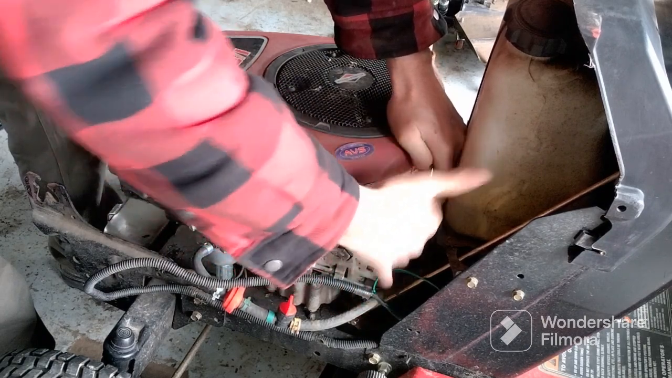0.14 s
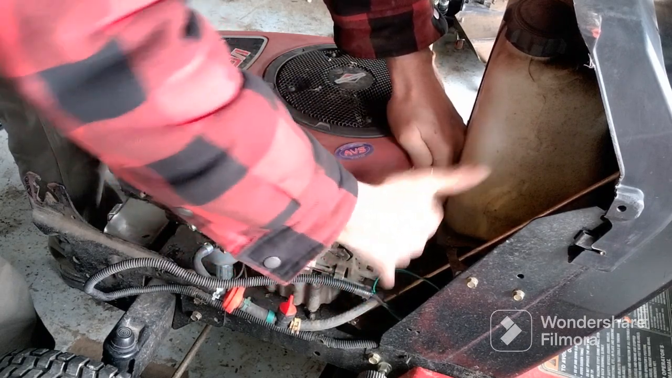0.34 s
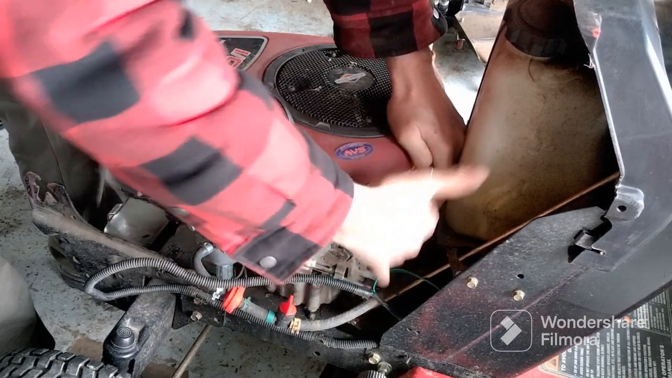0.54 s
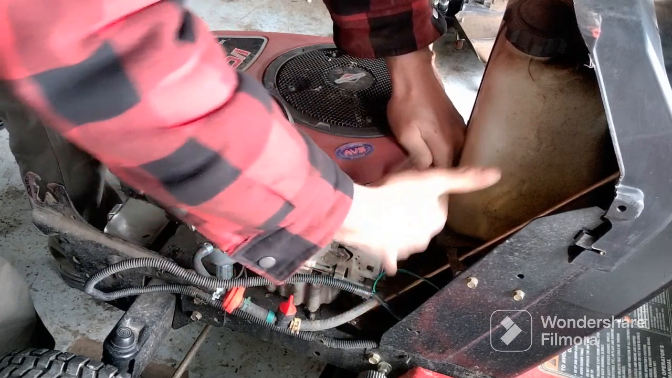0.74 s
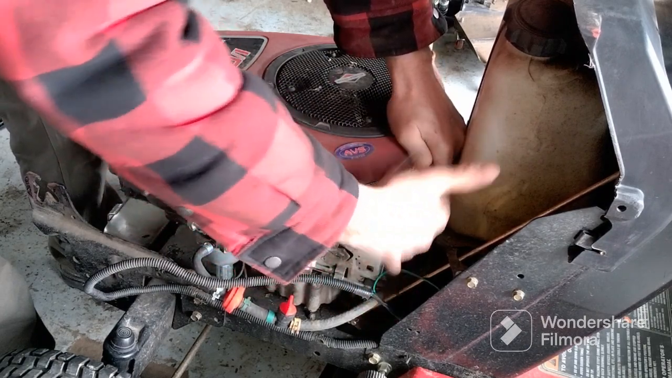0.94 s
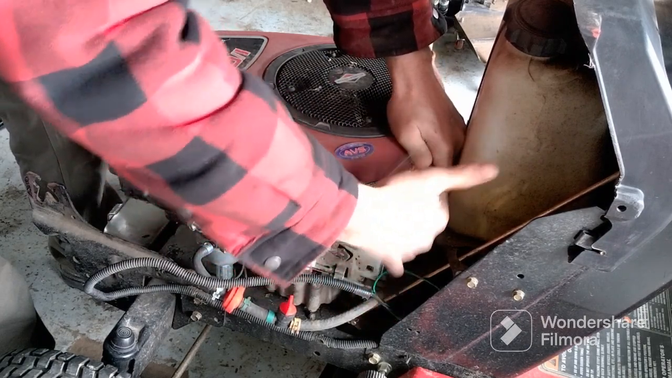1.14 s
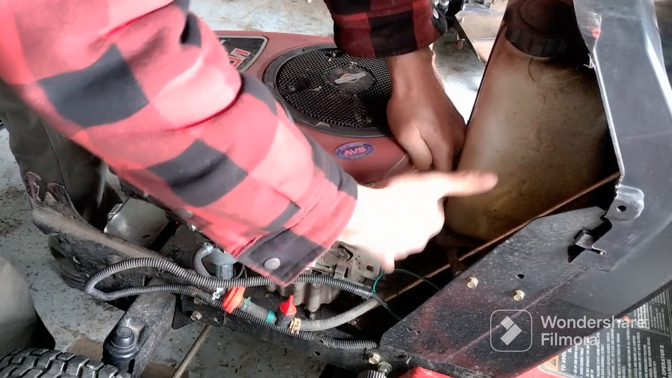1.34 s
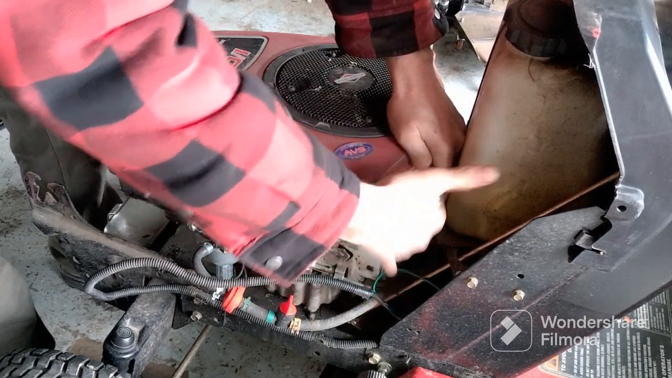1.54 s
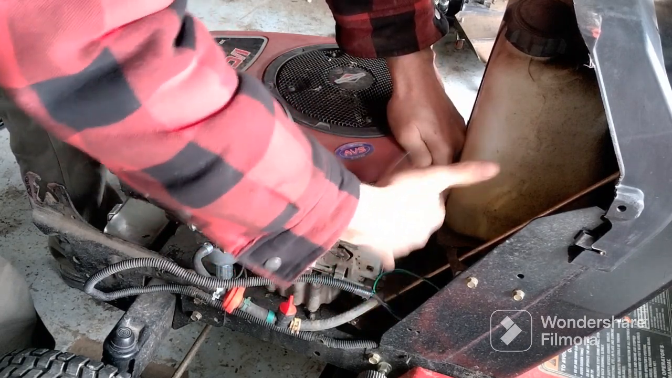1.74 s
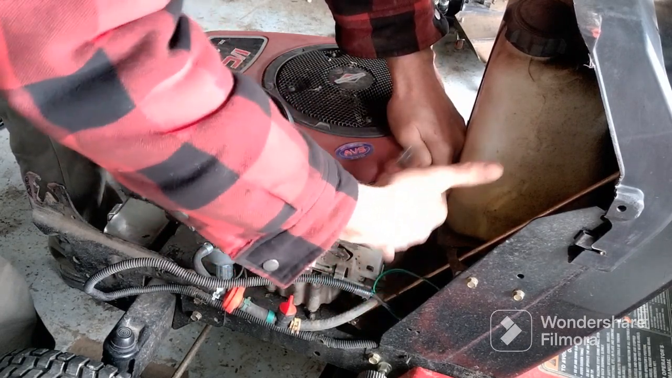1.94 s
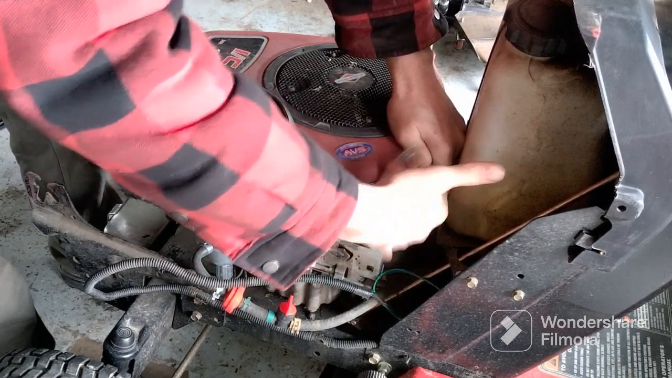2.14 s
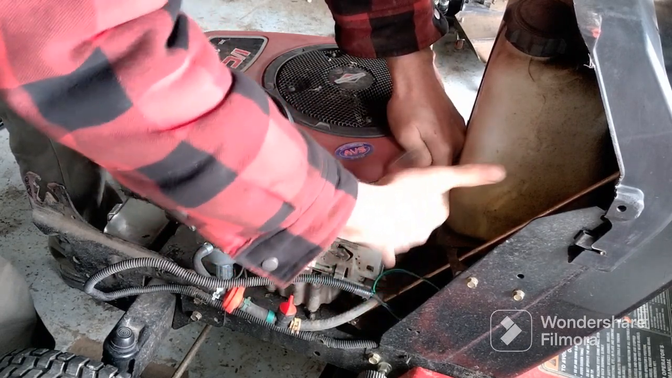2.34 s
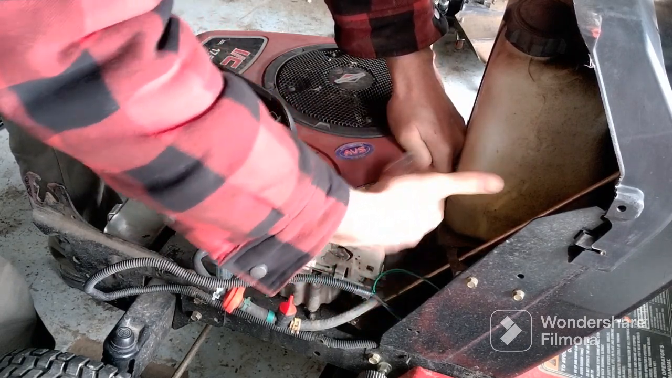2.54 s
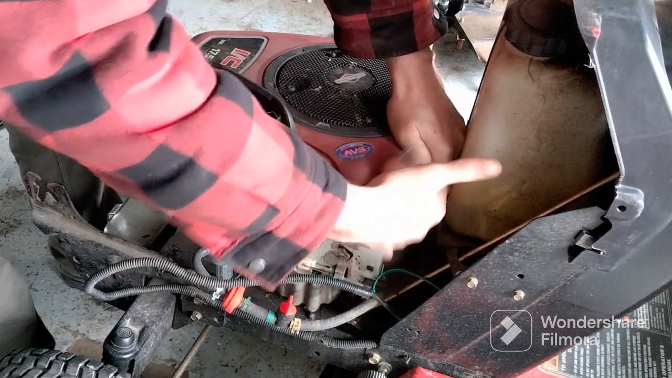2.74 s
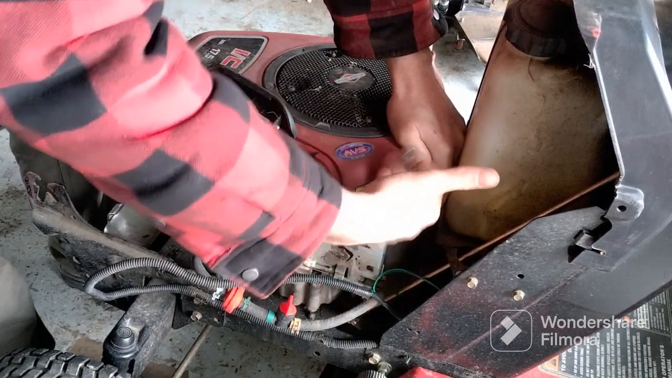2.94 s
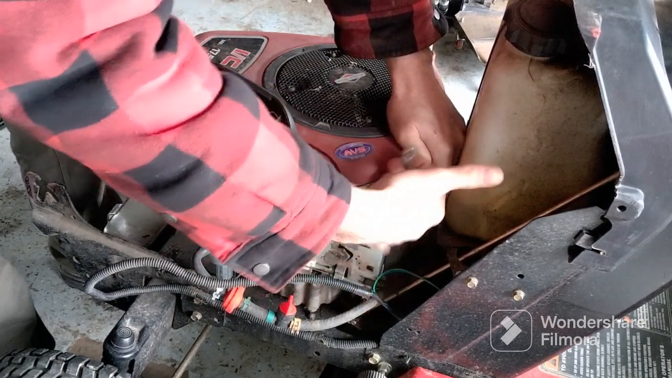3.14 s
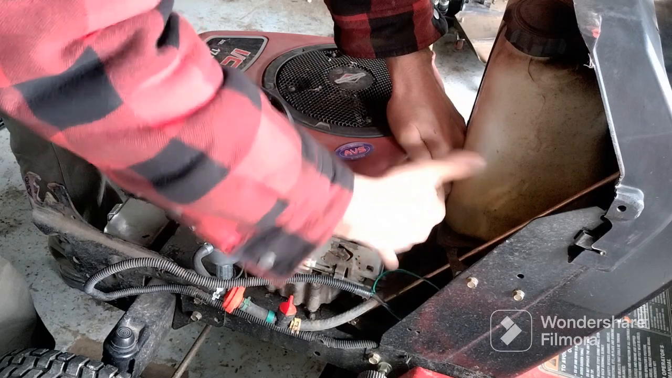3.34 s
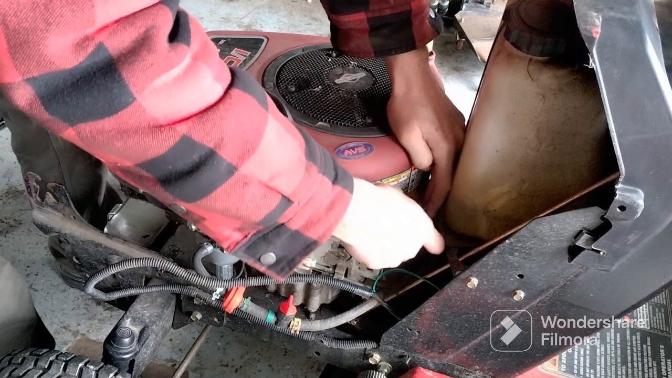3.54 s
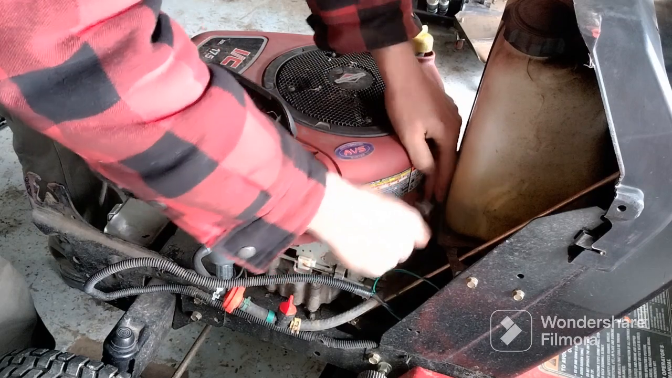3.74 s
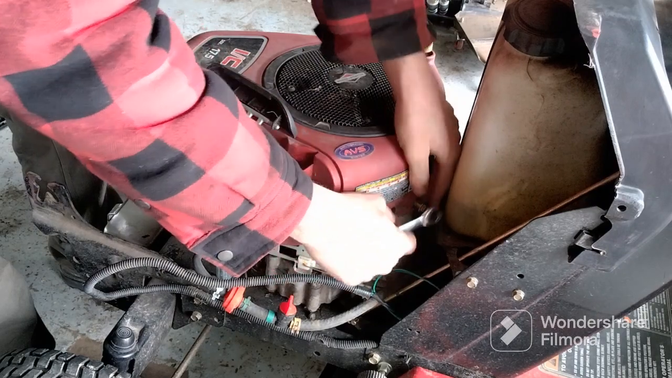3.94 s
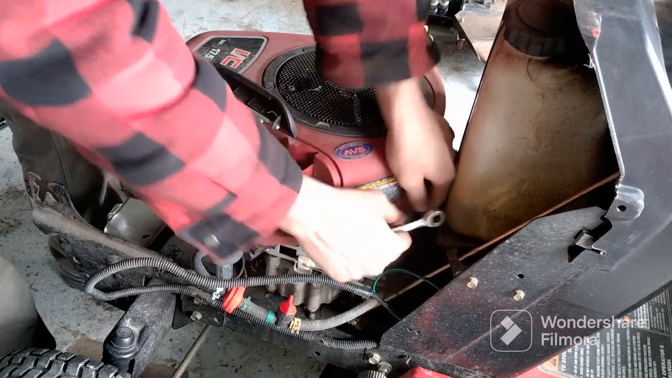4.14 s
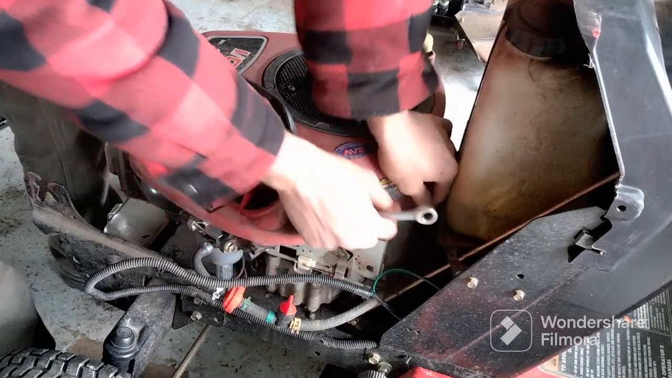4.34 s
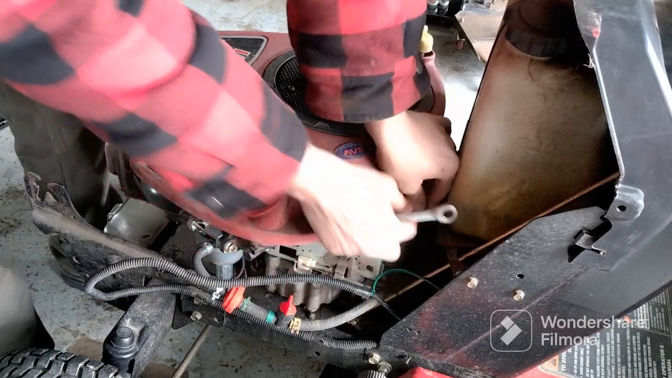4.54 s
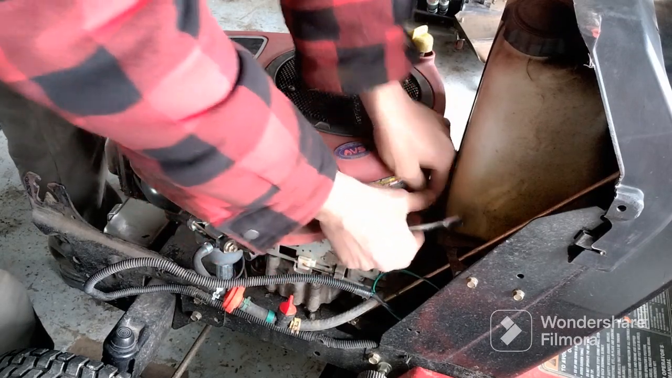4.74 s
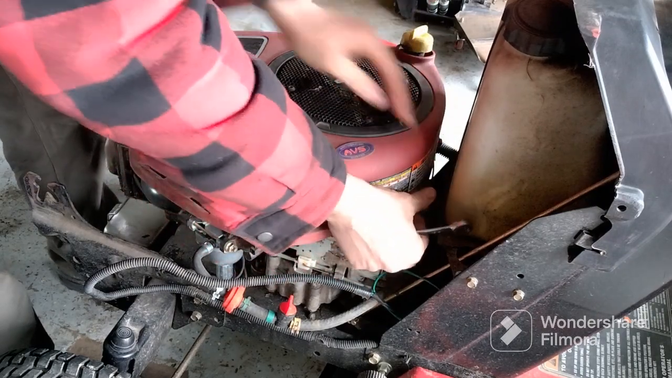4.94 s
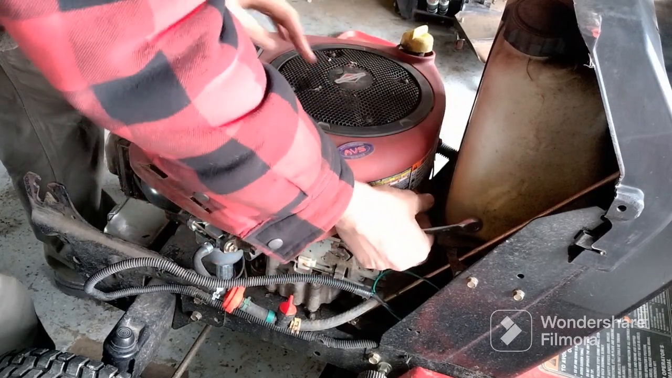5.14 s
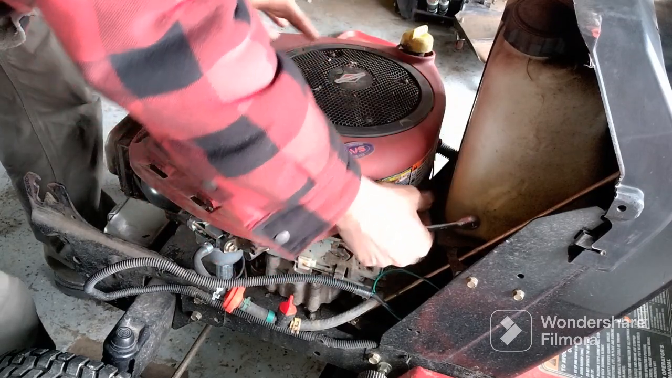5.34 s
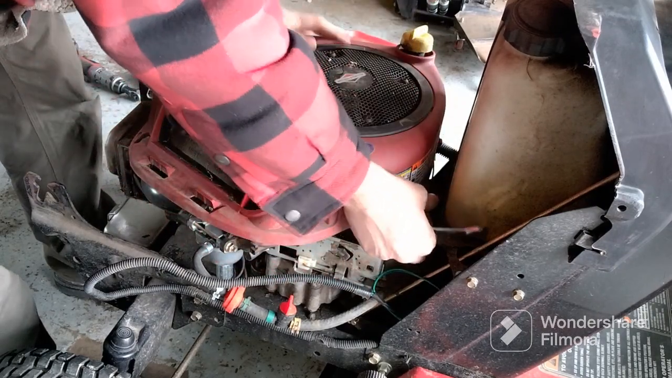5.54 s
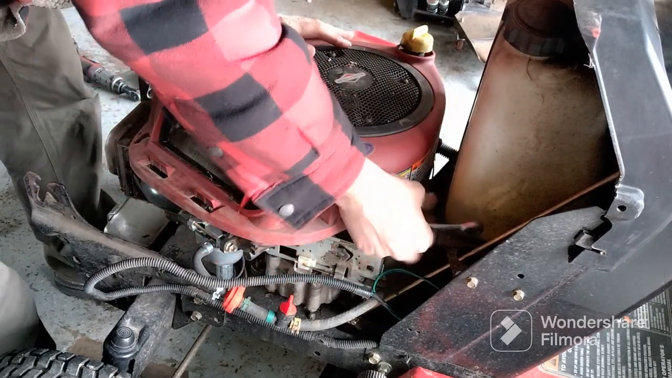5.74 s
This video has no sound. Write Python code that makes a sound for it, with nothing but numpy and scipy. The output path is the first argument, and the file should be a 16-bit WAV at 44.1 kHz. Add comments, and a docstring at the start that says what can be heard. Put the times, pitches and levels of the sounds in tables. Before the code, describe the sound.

A ratchet wrench clicks in quick, even bursts on an engine, then metal clanks once and a low hum swells and fades.

```python
"""Ratchet wrench on a mower engine

A ratchet wrench backs a bolt out, five quick swings a second. On each return swing its pawl (a small
catch) zips over the gear teeth. Tool and hands bump the engine cover, then metal knocks hard once.
A low hum swells and fades, sleeves brush about, and the workshop echoes briefly after each knock."""
import sys
import numpy as np
from scipy import signal
from scipy.fft import rfft, irfft
from scipy.io import wavfile

SR = 44100
rng = np.random.default_rng(int(sys.argv[2]) if len(sys.argv) > 2 else 0)


def log_audio(samples):
    """Write samples as a 16-bit WAV file to the path given in sys.argv[1]."""
    # one column per channel
    frames = np.atleast_2d(samples).T
    # limit to full scale, then quantise
    limited = np.clip(frames, -1, 1)
    pcm = np.round(limited * 32767).astype(np.int16)
    wavfile.write(sys.argv[1], SR, pcm)


N = 255339
TIME = np.arange(N) / SR
EVENT_N = 2 ** 15  # samples in one short sound
EVENT_TIME = TIME[:EVENT_N]

# return swings of the wrench: (start [s], length [s], level [dB], extra ring of its head [dB])
SWINGS = [(.008, 0.057, -38, 0), (0.2333, 0.061, -35, 7.5), (0.434, 0.048, -33.5, 8),
          (0.6435, 0.039, -32.5, 9), (0.845, 0.05, -36, 2.5), (1.057, 0.039, -33, 5),
          (1.259, .046, -35, -0.5), (1.46, 0.05, -35, 4), (1.659, 0.05, -33, 4.5), (1.8629, .042, -32, 4.5),
          (2.068, 0.042, -34, 7.5), (2.278, 0.044, -34.5, 9.5), (2.467, .04, -36, 6.5),
          (2.671, 0.041, -34.5, 5), (2.866, 0.043, -35.5, 9.5), (3.082, 0.043, -33.5, 8.5),
          (3.292, 0.04, -33.5, 4.5), (3.475, 0.047, -32.5, 5.5)]


def ratchet(slow_hz=215, fast_hz=320, slow_db=-3.5, snap_db=2, ring_db=-20, detune=0.0058):
    """The pawl drops into each tooth, faster and harder in mid swing, and rings the wrench head."""
    # tone of a click: (frequency [Hz], level [dB])
    pawl_tone = [(700, -33), (1900, -11), (2560, -8.5), (3900, -5.5), (4400, 1), (5200, -2.5), (6100, 1.5),
                 (8300, 2.5), (9700, -1), (10300, -1), (11400, -4.5), (12700, -3.5), (13550, -1.5),
                 (14300, -10)]
    # ringing notes of the wrench head: (frequency [Hz], level [dB], fade time [s])
    head_modes = [(2576, -8.5, 0.058), (2949, -17, 0.073), (4600, -11.5, 0.06), (6340, -12, 0.099),
                  (7820, 1.5, .05), (8580, -3, 0.087), (9440, 6.5, 0.036), (11320, -3.5, 0.066),
                  (13760, 0, 0.0124), (13600, -31, 0.015), (13330, 12.5, 0.033), (13640, 8.5, 0.035)]
    out = np.zeros((2, N))
    size = 4096  # samples in a click
    for start, length, db, extra_ring_db in SWINGS:
        swing = np.zeros((2, 2 * size))
        shared_noise = rng.standard_normal((2, size))
        # the grip changes from swing to swing, and with it the tone and the ring
        tone = [(hz, band_db + 2 * rng.standard_normal()) for hz, band_db in pawl_tone]
        modes = [(hz * (1 + detune * rng.standard_normal()), mode_db + 2 * rng.standard_normal(), t60)
                 for hz, mode_db, t60 in head_modes]
        ringing = amp(ring_db + extra_ring_db) * ring(modes, spread=0.72)[:, :size]
        # every tooth meets the pawl a little differently
        chances = rng.standard_normal((32, 2))
        tooth_noises = rng.standard_normal((32, 2, size))
        s = 0
        for (late, hard), tooth_noise in zip(chances, tooth_noises):
            if s > length:
                break
            speed = np.sin(np.pi / 2 * np.interp(s / length, [0, 0.42, 1], [0, 1, 0]))
            burst = (shared_noise + 0.58 * tooth_noise) * fade(t60=0.023)[:size]
            click = colour(burst, tone) + ringing
            force_db = 2 * hard if s else snap_db  # the first tooth breaks free with a firm snap
            add(swing, s, click * amp(slow_db * (6 - speed) + force_db))
            teeth_per_s = slow_hz + (fast_hz - slow_hz) * speed
            s += (1 + 0.08 * late) / teeth_per_s
        gain = amp(db) / rms(swing[:, :int(length * SR)])
        add(out, start, gain * swing)
        # a faint tick of varying strength sounds just before each swing
        add(out, start - 0.005, gain * amp(slow_db - 30) * rng.random() * click)
    return room(out, wet_db=-6)


def clank(crack_db=3, ring_db=-26):
    """Metal strikes the engine, chatters and lands again."""
    # hard blows: (time [s], level [dB], treble tilt [dB per octave], fade time [s])
    blows = [(3.955, -10, 1.5, 0.039), (3.9569, -17.5, 0.5, 0.034), (3.963, -14, -2, 0.031),
             (4.056, -24, -1.5, 0.032)]
    # tone of the crack: (frequency [Hz], level [dB])
    steel_tone = [(110, -21), (260, 5), (370, -5.5), (500, 1.5), (1600, -4.5), (1830, -11.5), (3000, -6.5),
                  (3600, -11), (4500, -3), (5300, -1.5), (6150, -14.5), (7400, -2.5), (8650, -8),
                  (10700, -24), (11800, -15.5), (14300, -22)]
    # ringing notes of the engine: (frequency [Hz], level [dB], fade time [s])
    engine_modes = [(168, -5.5, 1), (260.8, -1.5, 0.65), (474, -6, 0.36), (725, -2, 0.3), (770, -2.5, 0.3),
                    (973, -8, 0.3), (1156, 0.5, 0.37), (1290, -1.5, 0.3), (1350, 1, 0.14),
                    (1565, -5.5, 0.27), (1652, -2, 0.29), (2430, -6, 0.25), (2690, -2.5, 0.25),
                    (3120, -0.5, 0.056), (3800, -9, 0.22), (4136, 3, 0.095), (4378, -5.5, 0.18),
                    (4629, -4, 0.18), (4990, -3, 0.18), (5229, -1, 0.18), (6190, 2, 0.081),
                    (7230, -2.5, 0.087), (7700, -6, 0.08)]
    out = np.zeros((2, N))
    for s, db, tilt_db, t60 in blows:
        crack = colour(stereo_noise(EVENT_N, apart_hz=1200) * fade(t60), steel_tone, tilt_db)
        ringing = ring(engine_modes, spread=0.97)
        add(out, s, amp(db) * (amp(crack_db) * crack + amp(ring_db) * ringing))
    return room(pan(out), wet_db=-6)


def bumps(gain_db=1, ring_db=-15, spot_db=1.5, contact_s=0.001):
    """Tool and hands knock dully on the engine cover; each spot brings out different notes."""
    # knocks: (time [s], level [dB], treble tilt [dB per octave], fade time [s])
    knocks = [(.002, -32.5, 2.5, 0.039), (0.013, -36, -4.5, 0.056), (.232, -47, -8, 0.097),
              (.329, -34, 4, 0.071), (.433, -45.5, -4.5, .075), (.531, -49, 5.5, 0.037),
              (.689, -41.5, -4, 0.028), (0.74, -41.5, -1, 0.039), (1.882, -42, 4, .12),
              (1.905, -41, -2, 0.047), (1.943, -41, 4, 0.029), (2.065, -36.5, 1.5, 0.054),
              (2.359, -34.5, 3.5, 0.031), (2.474, -41.5, -7, 0.035), (2.548, -42, 0.5, 0.15),
              (3.128, -51, -8, 0.069), (3.81, -46.5, 0.5, .08), (3.877, -41.5, 7, 0.3),
              (4.0561, -23.5, 4.5, 0.057), (4.0612, -34.5, 4, 0.091), (5.087, -31, -1.5, 0.05),
              (5.223, -44.5, -1.5, 0.093), (5.551, -47, -7, 0.034), (5.765, -53.5, 1, .066)]
    # tone of the thud: (frequency [Hz], level [dB])
    cover_tone = [(100, -25), (250, -19.5), (380, 3.5), (520, -0.5), (700, 0.5), (930, 4.5), (1150, -3),
                  (1650, -8), (1900, -14), (3500, -20.5), (7000, -30.5), (14000, -54.5)]
    # ringing notes of the cover: (frequency [Hz], level [dB], fade time [s])
    cover_modes = [(370, -6, 0.029), (518, 5.5, 0.1), (557, 4.5, 0.069), (868, -5.5, 0.043),
                   (938, -4.5, 0.051), (1227.5, 7.5, 0.03), (1327, -2.5, 0.066), (1508, -1, 0.059),
                   (1630, -9, 0.068)]
    out = np.zeros((2, N))
    push = 1 - np.exp(-EVENT_TIME / contact_s)  # the cover gives a little before it sounds
    # a faint extra knock each time the wrench turns round
    nudges = [(start, -59.5 + 0.5 * rng.standard_normal(), -4.5, 0.13) for start, *_ in SWINGS]
    for s, db, tilt_db, t60 in nudges + knocks:
        modes = [(hz, mode_db + tilt_db * np.log2(hz / 800) + spot_db * rng.standard_normal(), decay)
                 for hz, mode_db, decay in cover_modes]
        thud = colour(stereo_noise(EVENT_N, apart_hz=1886) * fade(t60), cover_tone, tilt_db)
        knock = push * (thud + amp(ring_db) * ring(modes, spread=0.92))
        add(out, s, knock * amp(db + gain_db) / rms(knock[:, :int(0.009 * SR)]))
    return room(pan(out), wet_db=-7.5)


def rough_bursts(grain_hz=350):
    """Short rough bands of noise: scrapes on the cover, and the brief ring as the metal lands again."""
    # bursts of noise: (start [s], length [s], level [dB], centre frequency [Hz])
    bursts = [(.019, 0.077, -54, 644), (1.519, 0.057, -50.5, 640), (2.761, 0.081, -55.5, 670),
              (3.128, 0.053, -49.5, 316), (3.808, 0.02, -48, 1090), (3.875, 0.037, -32.5, 1030),
              (4.06, 0.016, -34.5, 1190), (5.08, 0.079, -36.5, 274), (5.239, 0.29, -72, 3100),
              (5.354, 0.085, -53.5, 848), (5.381, 0.07, -47.5, 265), (5.54, 0.042, -48, 600),
              (5.601, 0.17, -47, 80.6)]
    out = np.zeros((2, N))
    for s, length, db, hz in bursts:
        roughness = grains(EVENT_N, hold=int(SR / grain_hz), scatter_db=4)
        arch = np.sqrt(np.abs(np.sin(np.pi * np.minimum(EVENT_TIME / length, 1))))
        noise = band(stereo_noise(EVENT_N, apart_hz=1510) * roughness, hz, width_hz=0.58 * hz)
        add(out, s, amp(db) * arch * unit(noise))
    return room(pan(out), wet_db=-7)


def hum(growth_db_per_s=13, octave_db=-29, idle_db=-58, waver_db=-26):
    """A nearly pure, wavering low drone comes in growing swells and sinks slightly in pitch."""
    # swells: (start [s], hold [s], level at the end of the hold [dB], fall [s])
    swells = [(3.26, 0.14, -50, 0.024), (3.542, 0.087, -48.5, 0.12), (3.941, 1.123, -32, 0.18),
              (5.62, 0.061, -44.5, 0.033)]
    # path of the pitch: (time [s], pitch [Hz])
    pitch_path = [(3.3, 126.7), (4.15, 121.1), (4.8, 119.9), (5.25, 120.2), (5.62, 116.6), (5.75, 111)]
    phase = 2 * np.pi * np.cumsum(np.interp(TIME, *np.transpose(pitch_path))) / SR
    waver = unit(colour(rng.standard_normal(N), [(10, -8), (20, -23), (60, -95)]))
    gain = amp(idle_db) * waver
    for s, hold, db, fall in swells:
        growing = amp(db - growth_db_per_s * np.maximum(s + hold - TIME, 0))
        gain += swell(s, rise=0.034, fall=fall, hold=hold) * (growing + amp(db + waver_db) * waver)
    return np.sqrt(2) * gain * (np.sin(phase) + amp(octave_db) * np.sin(2 * phase))


def sleeves(gain_db=-1):
    """Cloth fibres catch and slip in a soft, grainy hiss with each stroke of the arm."""
    # arm strokes: (time of top speed [s], level [dB], rise [s], fall [s])
    strokes = [(4.14, -49, .025, 0.039), (4.28, -55.5, 0.083, 0.041), (4.345, -63.5, 0.0093, 0.016),
               (4.55, -62.5, 0.067, 0.035), (4.665, -65, 0.03, 0.027), (5.04, -55.5, 0.088, 0.081),
               (5.648, -65.5, 0.019, .015)]
    # tone of the cloth: (frequency [Hz], level [dB])
    cloth_tone = [(880, -12.5), (1500, -3.5), (1960, -12), (2300, -7.5), (2920, -11), (3180, -10),
                  (8520, -6.5), (14500, -21)]
    speed = sum(amp(db + gain_db) * swell(s, rise, fall) for s, db, rise, fall in strokes)
    catches = grains(N, hold=64, scatter_db=3)
    return speed * unit(colour(stereo_noise(N) * catches, cloth_tone))


def tink(at_s=5.44, level_db=-60):
    """A light touch makes the loose wrench ring faintly."""
    # ringing notes of the handle: (frequency [Hz], level [dB], fade time [s])
    handle_modes = [(4230, 0, 0.052), (4270, 5, 0.042), (4530, 2.5, 0.061)]
    out = np.zeros((2, N))
    add(out, at_s, amp(level_db) * ring(handle_modes))
    return room(out, wet_db=-7)


def socket(level_db=-70, after_s=0.11):
    """On the driving stroke between two zips, the bolt and socket scrape faintly."""
    turning = sum(amp(level_db + 4 * rng.standard_normal()) * swell(s + after_s, rise=0.027, fall=0.04)
                  for s, *_ in SWINGS[:-1])
    roughness = grains(N, hold=128, scatter_db=4)
    return turning * unit(band(stereo_noise(N) * roughness, hz=4800, width_hz=4500))


def air(rumble_db=-54.5, rustle_db=-61):
    """The workshop rumbles quietly; arms and cover rustle unevenly while the wrench swings."""
    # tones of the rumble and the rustle: (frequency [Hz], level [dB])
    rumble_tone = [(15, -9), (25, -18), (54, 1.5), (129, -0.5), (187, -8), (257, -6.5), (335, -18.5),
                   (781, -12), (2250, -32), (3010, -31.5), (6850, -42), (8470, -38), (10700, -56),
                   (14000, -46.5)]
    rustle_tone = [(60, -10), (200, -11.5), (500, -9), (1100, -8), (2000, -35), (5000, -18), (14000, -38)]
    effort = np.interp(TIME, [0, 2.9, 3.7], [0.93, 0.67, 0])
    rustle = colour(stereo_noise(N), rustle_tone)
    uneven = amp(3 * np.interp(TIME, np.linspace(0, TIME[-1], 80), rng.standard_normal(80)))
    rumble = unit(colour(stereo_noise(N, bass_width=0.33), rumble_tone))
    return amp(rumble_db) * rumble + amp(rustle_db) * effort * uneven * rustle


def room(x, wet_db, build_s=0.0093):
    """Add the workshop's short echo at wet_db; its treble dies first."""
    # how long the echo lasts: (frequency [Hz], fade time [s])
    echo_times = [(100, 0.69), (400, 0.31), (1500, 0.36), (4500, 0.26), (8000, 0.21), (11000, 0.18),
                  (14000, 0.15)]
    hz, s, spectrum = signal.stft(stereo_noise(EVENT_N, apart_hz=800), SR)
    t60 = np.interp(hz, *np.transpose(echo_times))
    spectrum *= np.exp(-np.log(1000) * s / t60[:, None])
    tail = signal.istft(spectrum, SR)[1][:, :EVENT_N]
    tail *= 1 - np.exp(-(EVENT_TIME / build_s) ** 2)
    tail /= np.sqrt(np.sum(tail ** 2) / 2)
    return x + amp(wet_db) * signal.fftconvolve(x, tail, axes=1)[:, :N]


def ring(modes, spread=0.85):
    """A struck object's own fading notes (modes), slightly out of step between left and right."""
    out = 0
    for hz, db, t60 in modes:
        phase = spread * rng.uniform(-0.76, 1, (2, 1)) * min(hz / 1000, 2)
        out = out + amp(db) * fade(t60) * np.sin(2 * np.pi * hz * EVENT_TIME + phase)
    return out


def stereo_noise(size, apart_hz=900, bass_width=0.16):
    """Noise from all around: left and right are alike in the bass, unrelated above apart_hz."""
    mid, side = rng.standard_normal((2, size))
    width = np.clip(np.fft.rfftfreq(size, 1 / SR) / apart_hz, bass_width, 1)
    side = irfft(rfft(side) * width, size)
    return unit(mid + side * np.array([[1], [-1]]))


def colour(x, tone, tilt_db=0):
    """Filter a sound through (frequency [Hz], level [dB]) points, brighter by tilt_db per octave."""
    size = x.shape[-1]
    octave = np.log2(np.maximum(np.fft.rfftfreq(size, 1 / SR), 10))
    hz, db = np.transpose(tone)
    tilt = tilt_db * np.clip(octave, np.log2(200), np.log2(8000))
    gain = unit(amp(np.interp(octave, np.log2(hz), db) + tilt))
    # fold the filter forward in time, so that nothing sounds before a hit
    cepstrum = irfft(np.log(gain), size)
    cepstrum[1:size // 2] *= 2
    cepstrum[size // 2 + 1:] = 0
    return irfft(rfft(x) * np.exp(rfft(cepstrum)), size)


def band(x, hz, width_hz):
    """Keep only the frequencies around hz."""
    low = np.sqrt(hz ** 2 + (width_hz / 2) ** 2) - width_hz / 2
    return signal.sosfilt(signal.butter(3, [low, low + width_hz], "bandpass", fs=SR, output="sos"), x)


def grains(size, hold, scatter_db):
    """Roughness: a gain that jumps at random every `hold` samples."""
    return amp(scatter_db * np.repeat(rng.standard_normal(size // hold + 1), hold)[:size])


def swell(start, rise, fall, hold=0):
    """A gain that rises smoothly to 1 at the start, holds, then falls smoothly."""
    early = np.maximum(start - TIME, 0)
    late = np.maximum(TIME - start - hold, 0)
    return np.exp(-(early / rise) ** 2 - (late / fall) ** 2)


def fade(t60):
    """A gain that drops by 60 dB in t60 seconds, the fade time."""
    return np.exp(-np.log(1000) * EVENT_TIME / t60)


def pan(x, left_db=-1.5):
    """Make the left side differ from the right by left_db."""
    return x * amp([[left_db / 2], [-left_db / 2]])


def add(out, s, x):
    """Mix a stereo sound in at s seconds."""
    i = max(int(s * SR), 0)
    out[:, i:i + x.shape[1]] += x[:, :N - i]


def amp(db):
    """Turn decibels into a gain."""
    return 10 ** (np.asarray(db) / 20)


def rms(x):
    """Average strength of a signal (root mean square)."""
    return np.sqrt(np.mean(x ** 2))


def unit(x):
    """Scale to an average strength of 1."""
    return x / rms(x)


def scene():
    """All the sources together, in stereo."""
    return ratchet() + socket() + bumps() + rough_bursts() + clank() + tink() + hum() + sleeves() + air()


def record(dry):
    """Cap the highest peak and cut the treble above 14300 Hz."""
    treble_cut = signal.ellip(8, 0.2, 60, 14300, fs=SR, output="sos")
    return signal.sosfilt(treble_cut, np.clip(dry, -0.85, 0.85))


dry = scene()
out = record(dry)
log_audio(out)
```